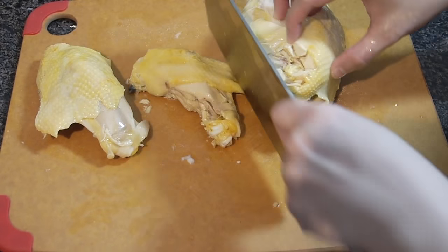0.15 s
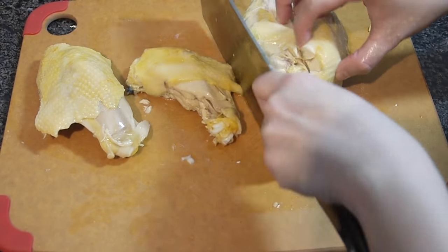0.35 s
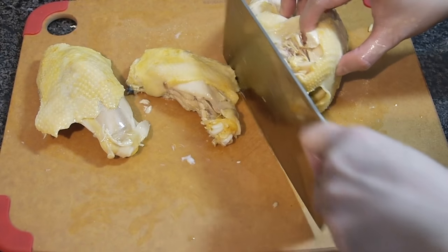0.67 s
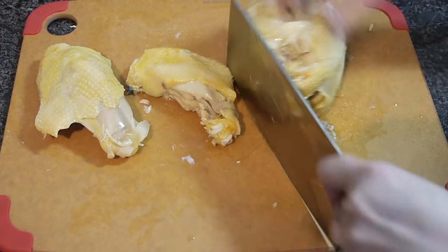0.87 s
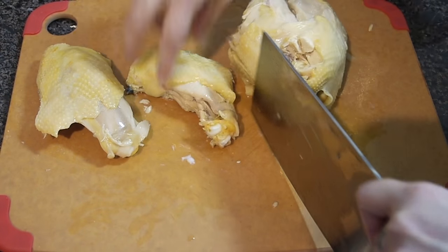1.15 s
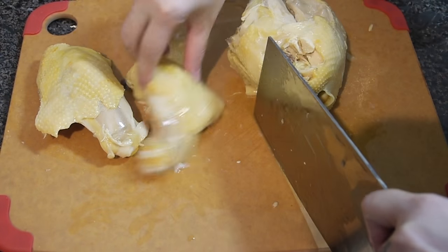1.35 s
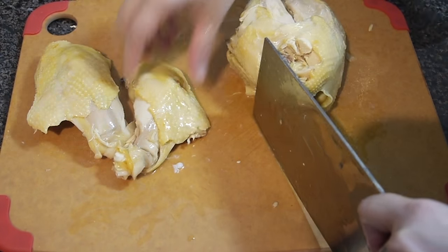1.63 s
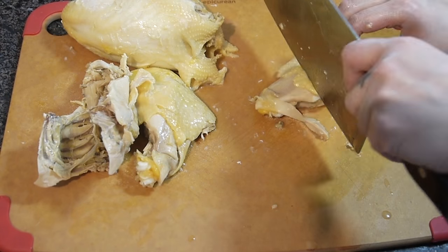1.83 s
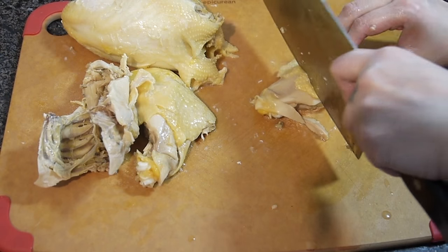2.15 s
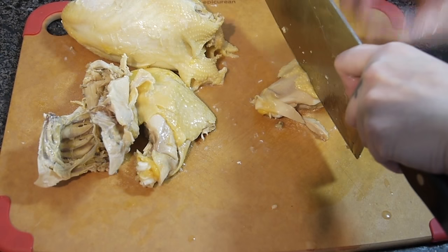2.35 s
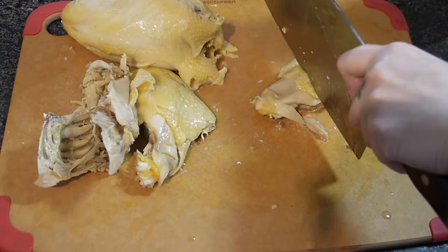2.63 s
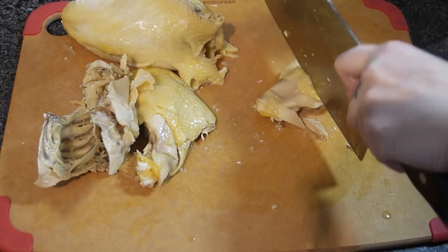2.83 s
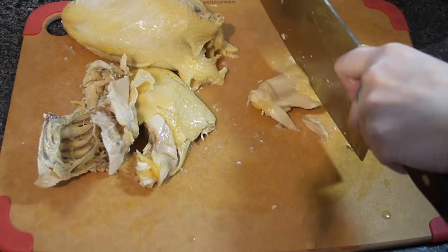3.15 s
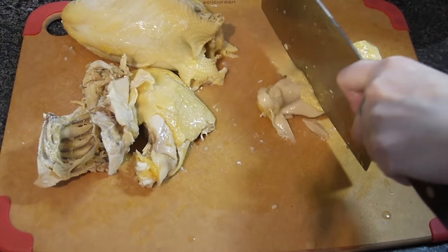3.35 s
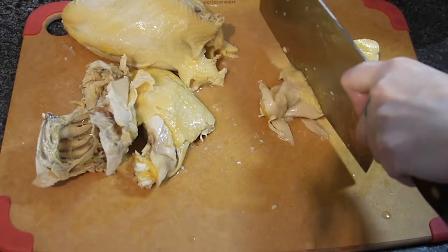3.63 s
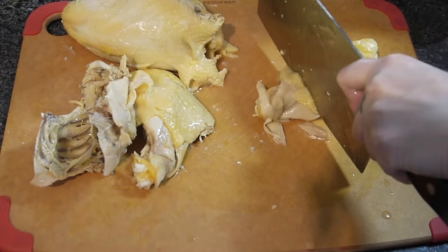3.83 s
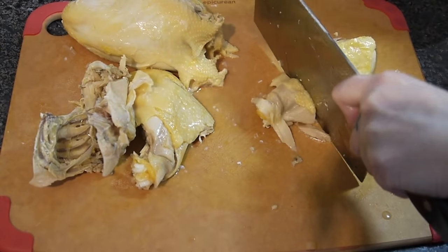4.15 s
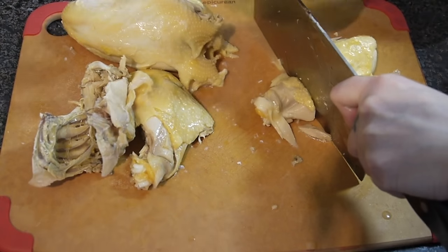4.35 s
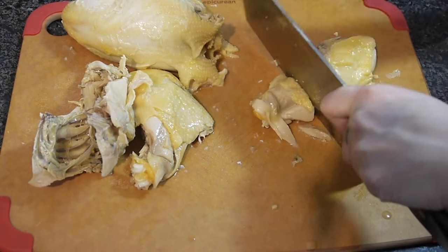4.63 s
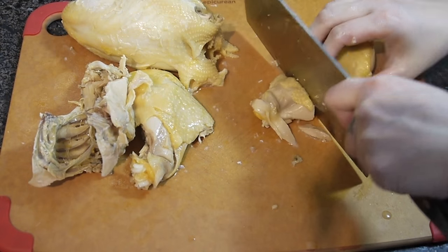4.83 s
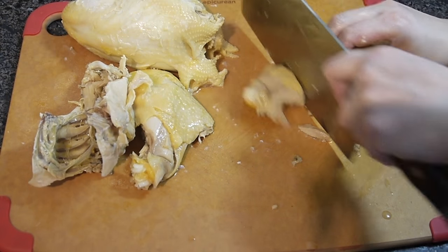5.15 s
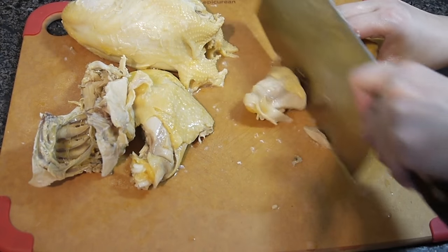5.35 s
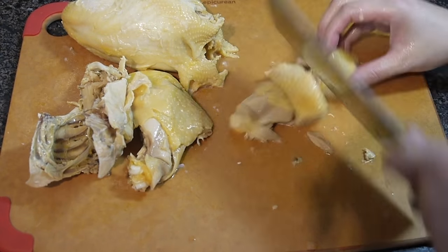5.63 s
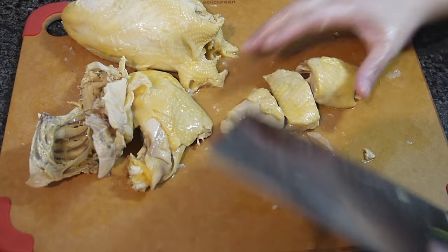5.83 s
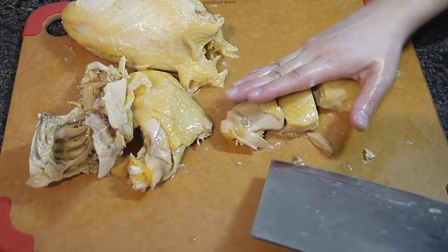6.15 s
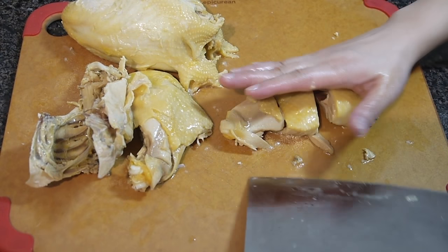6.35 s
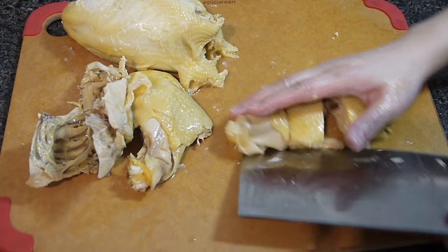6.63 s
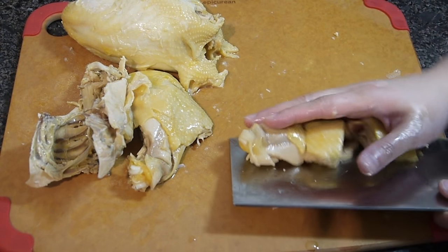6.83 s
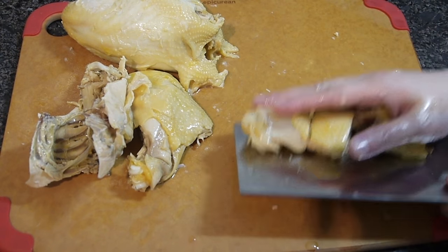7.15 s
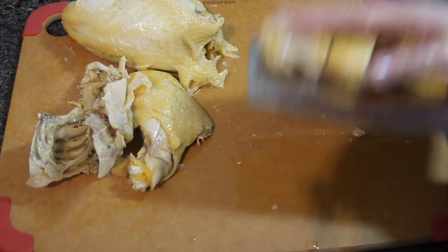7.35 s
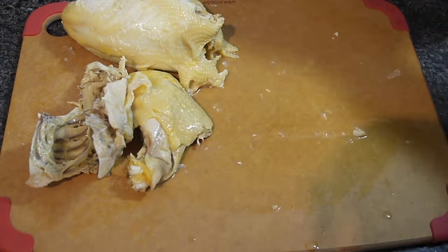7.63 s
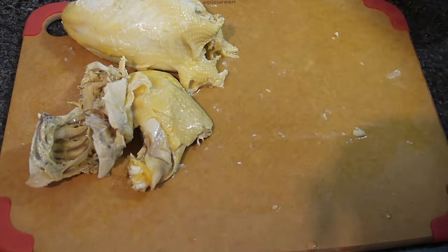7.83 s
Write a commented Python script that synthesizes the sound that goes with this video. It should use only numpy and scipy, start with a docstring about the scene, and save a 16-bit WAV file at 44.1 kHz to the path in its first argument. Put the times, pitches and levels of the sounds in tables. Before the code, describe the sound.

A heavy cleaver slams through bone-in chicken on a board, cracking and scraping, then a burst of chops, over a steady kitchen appliance hum.

```python
"""A cleaver is driven through cooked chicken on a board in a small kitchen: the hand slaps the blade's spine,
bone and gristle crack, the board knocks, the blade slides over the board and rings faintly.
An appliance hums over a steady rush of air; the recorder cuts the bass, ducks after loud blows and overloads."""
import sys
import numpy as np
from scipy import signal
from scipy.fft import rfft, irfft
from scipy.io import wavfile
from scipy.ndimage import uniform_filter1d

SR = 44100
rng = np.random.default_rng(int(sys.argv[2]) if len(sys.argv) > 2 else 0)


def bounce(signal):
    """Save signal as a 16-bit WAV file at the path given by the first command-line argument."""
    frames = np.transpose(np.atleast_2d(signal))
    limited = np.clip(frames, -1, 1)
    pcm = np.round(limited * 32767).astype(np.int16)
    wavfile.write(sys.argv[1], SR, pcm)


N = 351918

# knocks on blade and board: (s, peak dB, centre Hz, how deep the blade sits in the meat 0-1, ring of the steel dB re peak)
KNOCKS = [(0.392, 4, 905, 0.25, -16.5), (0.447, -27, 1020, 0.3, -20), (1.029, -12, 850, 0.36, -2), (2.013, -32.5, 806, 0.25, -1.5), (2.144, -38, 587, .2, -20),
          (2.399, -34.5, 1430, 0, -27), (2.8, -29, 890, .45, 0), (2.938, -29, 1200, 0.7, -12), (3.021, -17, 970, 0.83, -18),
          (3.025, -12.5, 1230, 0.4, -8.5), (3.062, -30, 937, .45, -16), (3.267, -12.5, 2410, 0.62, -12), (3.277, -18.5, 1790, 0.73, -15),
          (3.314, -24.5, 886, 0.5, -1.5), (3.45, -33.5, 1350, .45, -4), (3.508, -29, 1060, 1, -6), (3.51, -12.5, 2120, 0.82, -12),
          (3.545, -31, 665, 1, -16), (3.566, -24, 895, 0.43, 1), (3.745, -4.5, 653, 0.85, -33), (3.795, -26, 890, 1, -13), (4.013, -5, 2110, 0.4, -15),
          (4.02, -1.2, 1420, 0.26, -23), (4.195, -25.5, 930, 0.3, 0.5), (4.308, -8, 908, 0.75, -18), (4.318, -15, 640, 1, -18), (4.336, -17.5, 926, 0.4, -5),
          (4.357, -20, 865, 1, -46), (4.624, -38.5, 1030, .3, -15), (5.229, -32, 880, 0.4, -5), (5.394, -32, 2030, .45, -21),
          (5.486, -31.5, 1410, .45, -19), (5.974, -32, 950, 0.4, -26), (6.425, -14.5, 840, 0, -1), (6.431, -19, 1980, .1, 5.5), (6.627, -30.5, 1130, 0.74, -26),
          (6.79, -32, 1540, 0, -18), (7.852, -34, 860, 0.5, -10)]
# cracks of bone, gristle and wet skin: (s, peak dB, pitch Hz, treble peak dB re peak)
CRACKS = [(0.3913, -13, 3250, -19), (.9544, -38, 7800, -9), (1.1363, -35, 2620, -2.1), (1.996, -29, 4200, -12), (2.1445, -33, 2570, -6), (2.754, -32, 3530, 0),
          (3.0106, -26.5, 2610, 7.5), (3.0215, -10, 3800, -8), (3.045, -22, 4000, 1), (3.186, -28, 2460, -16), (3.2614, -33, 2720, 4),
          (3.2674, -24, 2500, -11), (3.271, -15.5, 3040, 2), (3.3884, -45, 5900, 13), (3.5032, -21.5, 2490, -2), (3.5088, -18, 5500, 2),
          (3.5133, -21.5, 2570, 7), (3.688, -34, 3820, -2), (3.7388, -15, 2600, 4.5), (3.7465, -6.5, 3000, -7), (3.7514, -25, 2820, 11),
          (4.0084, -15, 3200, 0), (4.0121, 3.5, 2730, -2.5), (4.0133, -2, 4530, -5), (4.019, -2.5, 2470, -4), (4.1953, -19.5, 2570, -21),
          (4.2764, -47, 3160, -15), (4.3006, -16, 3240, 1.5), (4.3044, -13, 2450, -3), (4.3435, -14, 4220, -21), (4.357, -16, 4530, -14),
          (4.8894, -32.5, 8200, -23), (5.1524, -41, 3460, 6), (5.3368, -34, 4600, -10), (5.368, -29.5, 2400, -7), (5.3966, -26, 2200, -17), (5.444, -27, 2730, 5.5),
          (5.5787, -27, 3900, -27), (5.605, -37, 5400, -10), (6.1594, -38.5, 6800, -12), (6.175, -36, 2960, 0), (6.2056, -33.5, 3340, -26),
          (6.2444, -35, 5800, -4), (6.4238, -25, 2130, -20), (6.4264, -16.5, 4960, -36), (6.7844, -44, 5800, -15), (6.8444, -44, 4940, 6),
          (7.1134, -50, 3200, 16), (7.1984, -42, 2850, 9)]
# meat tearing and juice fizzing after each chop: (s, dull dB, bright dB, t60 s)
TEARING = [(3.018, -26.5, -32.5, 0.21), (3.262, -35, -28.5, 0.35), (3.325, -52, -27.5, 0.078), (3.502, -35.5, -36, 0.33), (3.74, -32.5, -31, 0.26),
           (4.009, -37, -35, 0.031), (4.022, -25.5, -57, 0.74), (4.194, -35, -65, 0.16), (4.299, -32, -41, 0.34), (4.346, -33, -31, .15)]
# blade sliding on the board, one table a stroke: (s, friction level dB)
SLIDES = [
    [(0.5, -54), (0.588, -49), (0.596, -47.5), (0.67, -44.5), (0.854, -58), (0.958, -48.5), (0.98, -54)],
    [(1.04, -47.5), (1.128, -50), (1.138, -46), (1.23, -52.5), (1.296, -60), (1.3, -65)],
    [(1.88, -68), (1.902, -74), (1.916, -52.5), (1.982, -54), (1.998, -49), (2.006, -51), (2.12, -64)],
    [(5.08, -66), (5.156, -47), (5.226, -48), (5.248, -48), (5.272, -57), (5.3, -60)],
    [(5.3, -59), (5.366, -46.5), (5.454, -42), (5.556, -52.5), (5.614, -42), (5.638, -69), (5.7, -52)],
    [(6.7, -58), (6.736, -62), (6.786, -49.5), (6.834, -58), (6.844, -47), (6.868, -73), (6.9, -53)],
]
# struck modes: (Hz, dB, t60 s); the first STEEL_MODES rows belong to the blade, the rest to the board
STRUCK = [(872, 11, 0.098), (1914, 0, 0.096), (2013, 0.5, 0.074), (2670, 1, 0.04), (4000, -10, 0.048), (5330, -6, 0.087),
          (619, 8.5, 0.051), (776, -4, 0.18), (1013, 9.5, 0.092), (1220, 7, 0.092), (1326, 7.5, 0.041),
          (1576, 3, 0.15), (2160, 1, 0.048), (2416, 6, 0.035), (3530, 3, .08)]
# blade rubbed: (Hz, width Hz, dB re friction noise)
RUBBED = [(885, 60, -8), (1640, 60, -13), (1900, 60, -13), (4600, 90, -22), (5460, 70, -22), (6160, 70, -21),  # fixed
          (7800, 70, -20), (8610, 80, -17), (9300, 70, -19), (9900, 80, -18), (11100, 80, -19), (12000, 80, -21)]  # fixed
HUM = [(275.5, 5.8, -60), (314.3, 34, -58), (359.3, 15.6, -56), (407.3, 84, -55.5), (1261, 12, -62.5), (8155, 570, -68.5)]   # (Hz, width Hz, rms dB)
AIR = [(60, -46), (130, -31), (200, -16), (300, -13), (467, -12), (919, -11.5), (1300, -13), (2450, -20.5), (5000, -26), (8420, -31.5), (12000, -33.5), (15800, -46)]   # (Hz, dB per Hz)
ROOM_DB, ROOM_T60_S, ROOM_TREBLE_T60_S = -16, 0.37, 0.26
BASS_CUT_HZ = 170
DUCK_DB_PER_ENERGY, DUCK_RECOVER_S = 2474, 0.99
CUTOFF_HZ = 16100   # fixed
T = np.arange(N) / SR
# jolts that reach the microphone through the worktop: (s, peak dB, length s)
JOLTS = [(0.391, -20, 0.0031), (3.745, -33, 0.00054), (4.015, -2.5, .002)]
BOOM_HZ, BOOM_T60_S = 270, 0.24
HUM_TONES = [(214, -57.5), (319, -55.5)]   # (Hz, rms dB)
AIR_DB = -46
MIC_TREBLE_HZ, SUBSONIC_HZ = 12100, 1.7
RATTLE_T60_S, RATTLE_BLUR_HZ = 0.21, 90
WHISTLE_HZ, WHISTLE_WIDTH_HZ = 2620, 35   # fixed
KNOCK_T60_S = 0.062
# dB re peak for a free blade and for a buried one: the meat passes the blow to the board and damps the ringing
BOOM_DB, RING_DB, RATTLE_DB = (-50.5, -10), (-7, -7.5), (-29.5, -14)
RATTLE_TUNED_DB = 0.5   # share of the modes in the rattle, re ring
CRACK_TREBLE_HZ, CRACK_PITCH_SPREAD, CRACK_T60_S = 8400, 0.12, 0.014
TICKS_PER_S, TICK_DB, TICK_SPREAD_DB = 3.0, -47, 2.0   # fixed; faint wet ticks at random moments
SLIDE_MEAN_DB, HISS_DB, HISS_GROWTH = -40, 0, .3   # harder rubbing is brighter: extra hiss dB per dB of level
# the blade whistles: (start s, length s, rms dB)
WHISTLES = [(0.577, 0.16, -44), (1.1, 0.15, -50), (5.36, 0.16, -49)]
CRACK_WIDTH, CRACK_WIDTH_LOUD = 1.12, 1   # band edge over pitch for a faint pop; what a full-scale crack adds
MEAT_DAMPING = 2.6   # the modes under a buried blade die this many times faster still
STEEL_MODES = 6   # fixed
MODE_REACH = 3.4   # modes above this multiple of a knock's centre are excited less
POPS_PER_S, POP_CYCLES, POP_DB = 300, 40.0, -3   # fixed; wet pops under the sliding edge; level re friction


def from_db(db):
    """dB to gain."""
    return 10 ** (np.asarray(db) / 20)


def rms_one(x):
    """Scale to rms 1."""
    return x / np.sqrt(np.mean(x ** 2) + 1e-20)


def band(x, low_hz, high_hz, order=1):
    """Broad band-pass."""
    return signal.sosfilt(signal.butter(order, [low_hz, min(high_hz, .45 * SR)], "band", fs=SR, output="sos"), x)


def ring(x, hz, width_hz):
    """Resonance with gain 1 on top."""
    r = np.exp(-np.pi * width_hz / SR)
    return signal.lfilter([(1 - r * r) / 2, 0, (r * r - 1) / 2], [1, -2 * r * np.cos(2 * np.pi * hz / SR), r * r], x)


def drift(rate):
    """Slow chance of spread 1."""
    points = rng.standard_normal(int(8 * rate) + 2)  # fixed
    return np.interp(T * rate, np.arange(len(points)), points)


def grit(size, spread_db):
    """Dense clicks of uneven strength, rms 1."""
    return rms_one(rng.standard_normal(size) * from_db(spread_db * np.minimum(rng.exponential(1, size), 4)))


def add(out, s, sound):
    """Mix a sound in at a time."""
    i = round(s * SR)
    out[i:i + len(sound)] += sound[:N - i]


def stroke(tables):
    """Level in dB along a set of strokes, silent between them."""
    out = np.full(N, -100.)  # fixed
    for rows in tables:
        s, db = np.transpose(rows)
        out = np.maximum(out, np.interp(T, [s[0] - .03, *s, s[-1] + .03], [-100, *db, -100]))  # fixed
    return out


def knocks():
    """A dense wooden knock around its own pitch, boom and rattle of the board, and the modes of board and blade ringing on."""
    out, t = np.zeros(N), T[:12288]  # fixed
    hz, level_db, mode_t60 = np.transpose(STRUCK)[:, :, None]
    ringing = np.exp(2j * np.pi * hz * t) * from_db(-60 * t / mode_t60) * np.minimum(t / .001, 1)  # fixed
    bins = np.fft.rfftfreq(len(t), 1 / SR)
    blurred = np.sum(from_db(level_db) / (1 + 2j * (bins - hz) / RATTLE_BLUR_HZ), axis=0)   # the rattle keeps exciting the modes
    for s, peak_db, centre_hz, buried, steel_db in KNOCKS:
        boom_db, ring_db, rattle_db = (free + (held - free) * np.clip(buried, 0, 1) for free, held in (BOOM_DB, RING_DB, RATTLE_DB))
        luck, white = rng.standard_normal((len(STRUCK), 2)), rng.standard_normal((3, len(t)))
        force = from_db(peak_db / 2)
        rise = np.minimum(t * force / .0002, 1)  # fixed; light touches are soft and rise slowly
        spread = 1.3 + .8 * force  # fixed; harder blows cover more pitches
        contact = white[0] * rise * from_db(-60 * t / KNOCK_T60_S)
        contact[0] = 28 * force  # fixed; heavy blows start with one sharp push
        wood = peak_one(band(contact, centre_hz / spread, centre_hz * spread, order=2))
        boom = peak_one(band(white[1] * from_db(-60 * t / BOOM_T60_S), BOOM_HZ / 2, BOOM_HZ * 1.66, order=2))
        reach = 1 / (1 + (bins / (3.1 * centre_hz)) ** 4)
        tuned = from_db(ring_db + RATTLE_TUNED_DB) * rms_one(irfft(rfft(white[2]) * blurred * reach))   # a freer blade colours the rattle more
        loose = tuned + rms_one(band(white[2, ::-1], centre_hz / 2, centre_hz * 1.16))
        rattle = peak_one(loose * rise * from_db(-60 * t / RATTLE_T60_S))
        gains = from_db(level_db[:, 0] + 0.83 * luck[:, 0]) / (1 + (hz[:, 0] / (MODE_REACH * centre_hz)) ** 2)
        struck = gains * np.exp(6j * luck[:, 1])
        damped = rise * from_db(-60 * t * MEAT_DAMPING * np.clip(buried, 0, 1) / np.median(mode_t60))
        blade = peak_one((struck[:STEEL_MODES] @ ringing[:STEEL_MODES]).imag * damped)
        board = peak_one((struck[STEEL_MODES:] @ ringing[STEEL_MODES:]).imag * damped)
        body = wood + from_db(boom_db) * boom + from_db(ring_db) * board + from_db(steel_db) * blade + from_db(rattle_db) * rattle
        add(out, s, from_db(peak_db) * body)
    return out


def cracks():
    """Short bursts of splintering around a pitch, with a treble spray; faint ticks fall in between."""
    out, t = np.zeros(N), T[:SR // 12]
    luck = rng.random((round(TICKS_PER_S * N / SR), 4))
    ticks = [(a * T[-1], TICK_DB - TICK_SPREAD_DB * np.log(1 - 1.05 * b), 2500 * 2.7 ** c, -12 * d) for a, b, c, d in luck]
    for s, peak_db, hz, treble_db in CRACKS + ticks:
        treble_hz = CRACK_TREBLE_HZ * np.exp(CRACK_PITCH_SPREAD * rng.uniform(-0.77, 1))
        width = max(CRACK_WIDTH, 1.05) + CRACK_WIDTH_LOUD * from_db(peak_db / 2)
        splinters = grit(len(t), spread_db=2.5) * from_db(-60 * t / CRACK_T60_S)  # fixed
        mid = peak_one(band(splinters, hz / width, hz * width, order=2))
        treble = peak_one(band(splinters, treble_hz / 1.55, treble_hz * 1.38, order=2))
        add(out, s, from_db(peak_db) * (mid + from_db(treble_db) * treble))
    return out


def tearing():
    """Gritty hiss in a dull and a bright band, swelling for some ms and dying after the blow."""
    out, t = np.zeros(N), T[:SR // 2]
    for s, dull_db, bright_db, t60 in TEARING:
        dull = rms_one(band(grit(len(t), spread_db=4), 730, 4300))
        bright = rms_one(band(grit(len(t), spread_db=4), 8500, 12500, order=2))  # fixed
        shape = np.minimum(0.42 + t / 0.0047, 1) * from_db(-60 * t / t60)
        add(out, s, (from_db(dull_db) * dull + from_db(bright_db) * bright) * shape)
    return out


def slides():
    """The edge drags over the board: friction grit rumbles, hisses and rings the blade's modes, each flickering on its own; juice pops."""
    friction = grit(N, spread_db=5.5) * from_db(1.8 * drift(150))  # fixed
    rings = [from_db(db + 6 * drift(30)) * rms_one(ring(friction, hz, width)) for hz, width, db in RUBBED]  # fixed
    singing = sum(from_db(db) * np.interp(T, [s - .004, s + .004, s + .8 * length, s + length], [0, 1, .6, 0]) for s, length, db in WHISTLES)  # fixed
    whistle = singing * rms_one(ring(rng.standard_normal(N), WHISTLE_HZ, WHISTLE_WIDTH_HZ))
    low = from_db(POP_DB) * pops() + sum(rings[:3]) + rms_one(band(friction, 640, 3540, order=2))
    high = sum(rings[3:]) + rms_one(band(friction, 2000, 10600, order=2))
    level_db = stroke(SLIDES)
    return whistle + from_db(level_db) * (low + from_db(HISS_DB + HISS_GROWTH * (level_db - SLIDE_MEAN_DB)) * high)


def appliance():
    """Motor tones that waver slightly, narrow noise resonances and a smooth rush of air."""
    hz = np.maximum(np.fft.rfftfreq(N, 1 / SR), 1)
    colour = from_db(np.interp(np.log(hz), np.log(np.array(AIR)[:, 0]), np.array(AIR)[:, 1]))
    air = rms_one(irfft(rfft(rng.standard_normal(N)) * colour, N))
    hum = sum(from_db(db) * rms_one(ring(ring(rng.standard_normal(N), f, w), f, w)) for f, w, db in HUM)
    tones = sum(np.sqrt(2) * from_db(db + 1.3 * drift(8.3)) * np.sin(2 * np.pi * np.cumsum(f + 2.55 * drift(5)) / SR) for f, db in HUM_TONES)
    return from_db(AIR_DB + .4 * drift(3)) * air + hum + tones  # fixed


def room(x):
    """Diffuse tail starting after 5 ms; the treble dies sooner."""
    t = T[:SR // 2]
    white = rng.standard_normal(len(t))
    low = band(white, 340, 3160)
    tail = low * from_db(-60 * t / ROOM_T60_S) + 0.22 * (white - low) * from_db(-60 * t / ROOM_TREBLE_T60_S)
    tail = tail * (t > .005)
    return from_db(ROOM_DB) * signal.fftconvolve(x, tail / np.sqrt(np.sum(tail ** 2)))[:N]


def peak_one(x):
    """Scale to peak 1."""
    return x / np.abs(x).max()


def jolts():
    """One-sided low pushes."""
    out = np.zeros(N)
    for s, peak_db, length in JOLTS:
        t = T[:round(length * SR)]
        add(out, s, from_db(peak_db) * np.sin(np.pi * t / length) ** 2)
    return out


def pops():
    """Sparse wet pops, each ringing briefly at one of many pitches; rms 1."""
    born = (rng.random(N) < POPS_PER_S / SR) * grit(N, spread_db=2.5)  # fixed
    pitches, dealt = np.geomspace(800, 4500, 10), rng.integers(0, 10, N)  # fixed
    return rms_one(sum(ring(born * (dealt == k) + 1e-18, hz, 3.0 * hz / POP_CYCLES) for k, hz in enumerate(pitches)))


def scene():
    """Work on the board, its room tail and the appliance."""
    work = knocks() + cracks() + tearing() + slides()
    work = signal.sosfilt(signal.butter(4, BASS_CUT_HZ, "high", fs=SR, output="sos"), work + room(work))
    work = signal.sosfilt(signal.butter(2, MIC_TREBLE_HZ, fs=SR, output="sos"), work)   # the top octave reaches the microphone dulled
    return (work + jolts() + appliance())[None]


def record(dry):
    """Gain control ducks by the recent energy and recovers slowly; hard overload; subsonic and top cuts."""
    keep = np.exp(-1 / (DUCK_RECOVER_S * SR))
    energy = signal.lfilter([1 - keep], [1, -keep], np.minimum(dry ** 2, 1))
    energy = uniform_filter1d(energy, size=4000, origin=1999)
    loud = np.clip(dry * from_db(-DUCK_DB_PER_ENERGY * energy), -.9, .9)  # fixed
    loud = signal.sosfilt(signal.butter(1, SUBSONIC_HZ, "high", fs=SR, output="sos"), loud)
    return signal.sosfilt(signal.cheby2(16, 50, CUTOFF_HZ, fs=SR, output="sos"), loud)


dry = scene()
out = record(dry)
bounce(out)
```